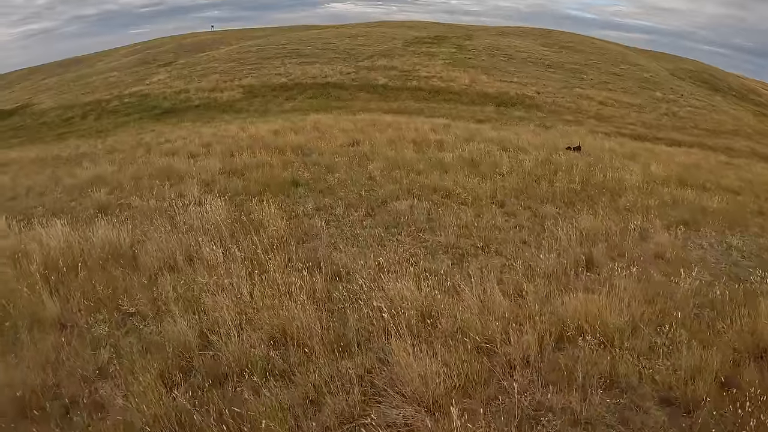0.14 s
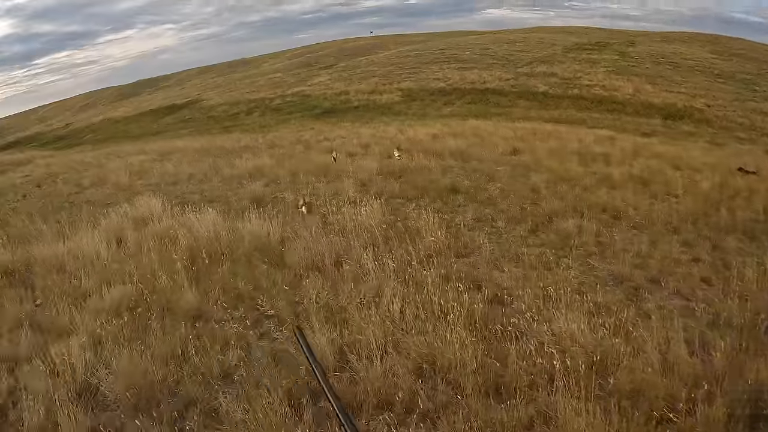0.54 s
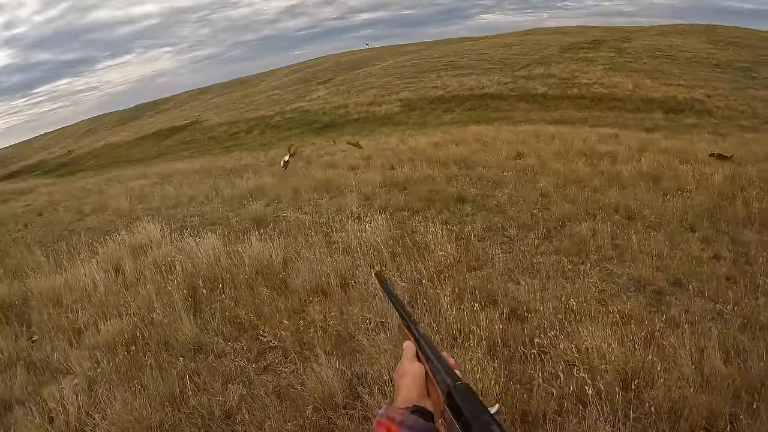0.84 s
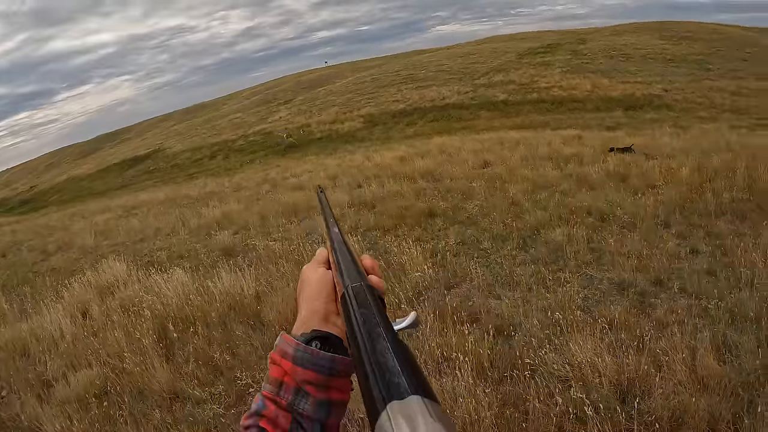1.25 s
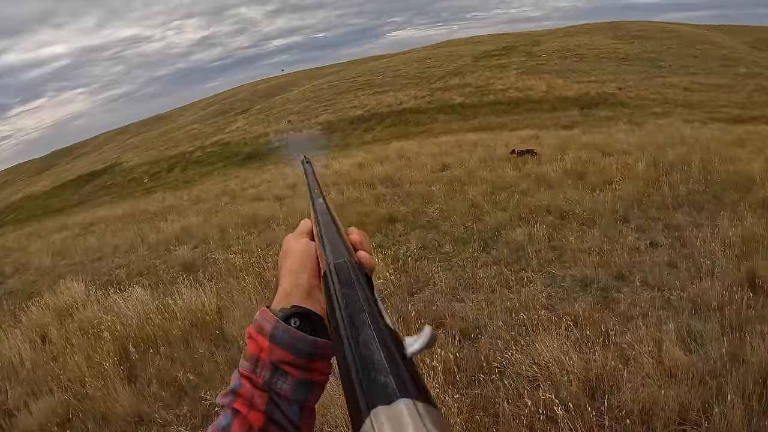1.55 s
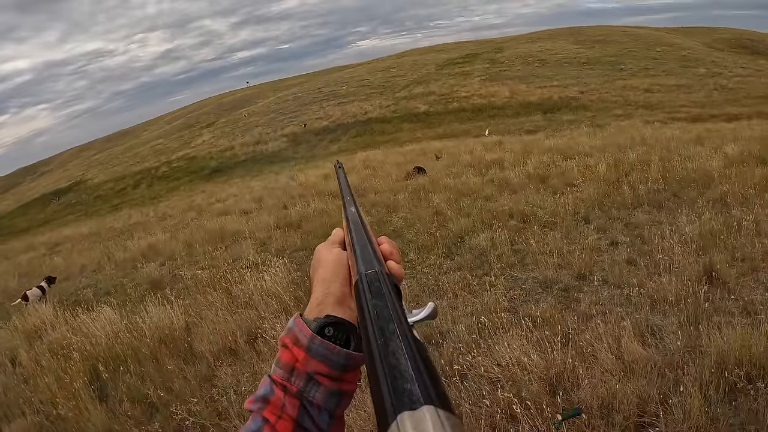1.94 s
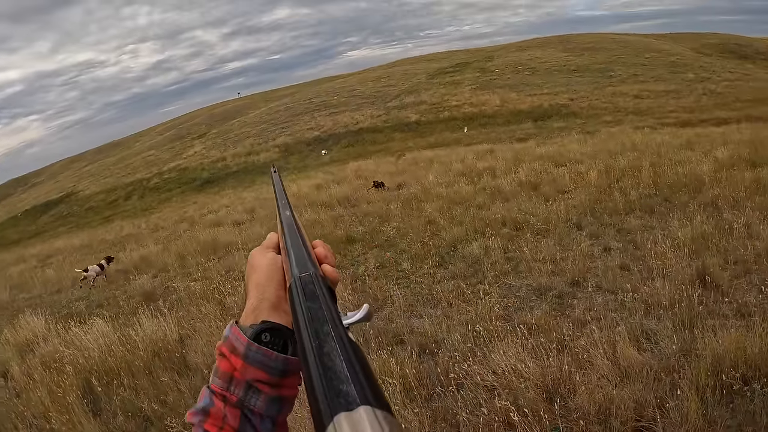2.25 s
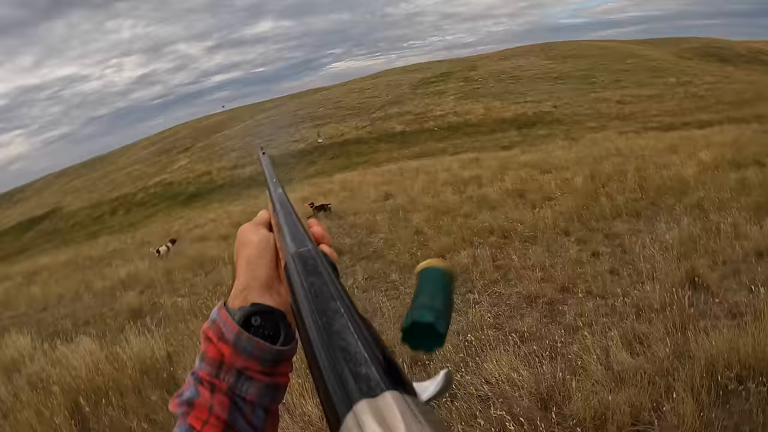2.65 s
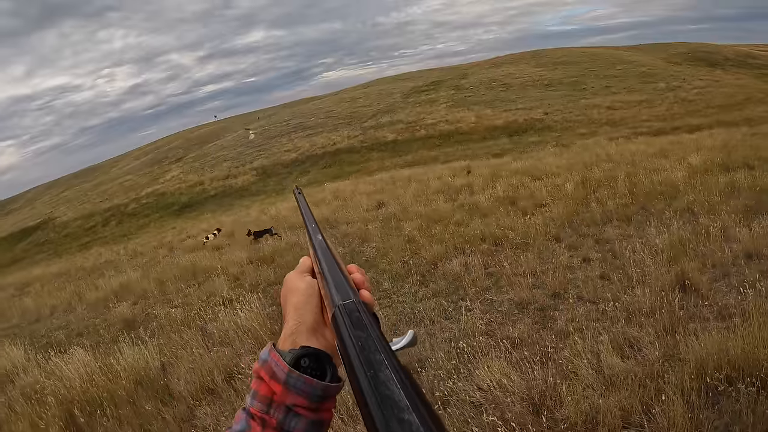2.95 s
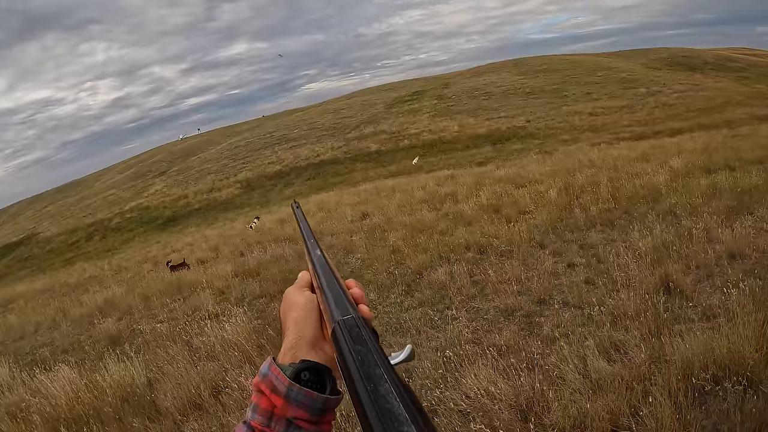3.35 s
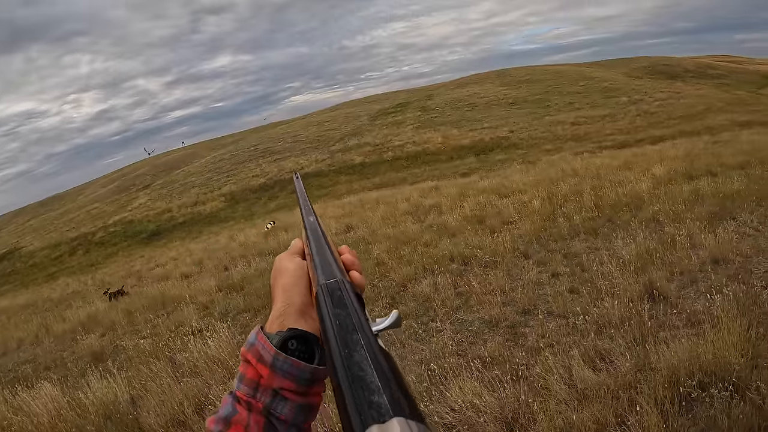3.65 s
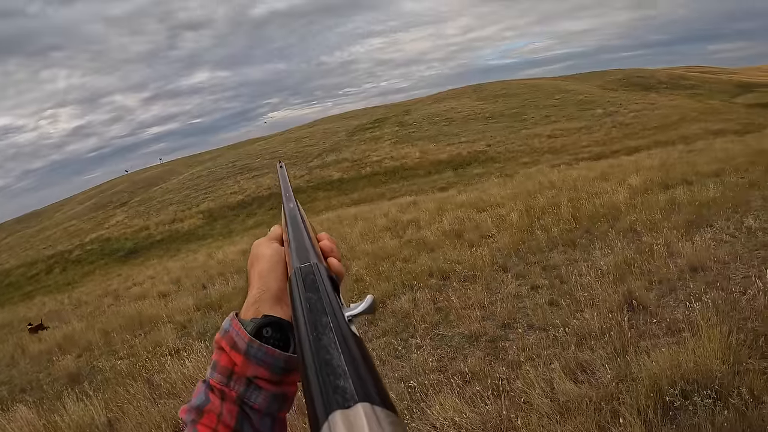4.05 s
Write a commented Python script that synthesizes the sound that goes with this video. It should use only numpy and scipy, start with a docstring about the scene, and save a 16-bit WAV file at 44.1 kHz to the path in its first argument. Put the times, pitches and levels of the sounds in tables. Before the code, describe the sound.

Outdoors on open grassy hills, heard from the shooter's position. Light wind, then a sudden rush of dry stems and rapid wingbeats as grouse flush nearby, clucking. The whirr draws away before two harsh, clipping shotgun shots about a second apart, each followed by quick metal clacks and a short hollow echo. Faint clucks continue between and after the shots.

```python
"""On dry prairie among grassy hills, grouse burst from the grass close to a hunter and fly off clucking.
Their wings whirr: bands of noise shaped by each stroke. The clucks are harmonic stacks through a throat.
Stems rustle as clumped impulses. Two shots from a self-loading shotgun follow, right at the microphone:
shock fronts and noise bursts, then clacks and ringing modes of the action. The hills return a short
rolling echo of decaying noise, over light wind of slowly varying coloured noise."""
import sys
import numpy as np
from scipy import signal
from scipy.fft import rfft, irfft
from scipy.io import wavfile
from scipy.ndimage import uniform_filter1d

SR = 44100
rng = np.random.default_rng(int(sys.argv[2]) if len(sys.argv) > 2 else 0)


def pcm_store(signal):
    """Save signal as 16-bit PCM."""
    levels = np.round(np.clip(np.atleast_2d(signal), -1, 1) * 32767)
    wavfile.write(sys.argv[1], SR, levels.astype(np.int16).T)


N = 185600

# Air buffeting the microphone, with one gust as the hunter swings the gun up.
# Each row: time in seconds, level in dB.
BUFFET_LEVEL = [(0, -37.5), (.27, -49), (.48, -24), (.68, -27), (.85, -32), (1.3, -40.5), (1.8, -38),
                (2.05, -52.5), (4.2, -55)]
# Spectrum of the buffeting. Each row: frequency in Hz, relative level in dB.
BUFFET_SPECTRUM = [(8, -4), (22, 0), (45, -8), (70, -5), (110, -12), (200, -26), (500, -70.5)]
# Wash of the open prairie, also the colour of the distant wings and slopes.
# Each row: frequency in Hz, relative level in dB.
AIR_SPECTRUM = [(60, -2), (150, -2.5), (250, -8), (550, -4.5), (900, -11.5), (1400, -13), (2200, -30),
                (5000, -42), (15500, -71)]
# Steady faint hiss. Each row: frequency in Hz, relative level in dB.
HISS_SPECTRUM = [(500, -0.5), (2500, -3.5), (5000, 2), (7500, -5), (9500, -19.5), (15500, -38)]
AIR_START_DB, AIR_FALL_DB_PER_S = -50.5, 5  # the breeze dies away

# Likeness of the noise at the two ports. Each row: frequency in Hz, correlation from 0 to 1.
LIKENESS = [(25, .8), (70, 1), (500, 0.95), (3000, 0.89), (6000, 1), (9000, 0.92), (14000, .5)]
# Balance of the ports; the left hears more of the high treble.
# Each row: frequency in Hz, left minus right in dB.
PORT_BALANCE = [(60, 0), (200, -1), (700, 0.1), (2400, -0.4), (4400, -0.5), (8000, 3.2), (15000, 4.5)]
# Phase between the ports; the right hears the middle range slightly early.
# Each row: frequency in Hz, radians by which the left leads.
PORT_PHASE = [(200, 0.11), (600, -0.098), (1300, -0.22), (3000, -.3), (7000, -0.071), (12000, 0)]
EDGE_HZ = 15750

# Swish of the grass. Each row: frequency in Hz, relative level in dB.
SWISH_SPECTRUM = [(120, -23), (200, -4.5), (385, -8.5), (800, -13.5), (1200, -9.5), (2560, -14),
                  (5000, -13), (7000, -16), (10000, -32), (12500, -30), (15500, -55.5)]
# Snapping stems, brighter than the swish. Each row: frequency in Hz, relative level in dB.
SNAP_SPECTRUM = [(120, -22), (200, -4), (800, -10), (1200, -7.5), (2500, -13.5), (7000, -10.5),
                 (10000, -23), (12500, -22.5), (15500, -49.5)]
# Rustle of dry stems brushed by birds and clothing. Each row: time in seconds, level in dB.
RUSTLE_LEVEL = [(.17, -75), (.23, -46), (.5, -46.5), (.9, -50.5), (1.56, -51), (2.2, -66), (3.7, -69),
                (4.2, -60)]
# Birds tearing out through the stems. Each row: middle in seconds, level in dB.
THRASHES = [(0.346, -31.5), (0.423, -33), (0.493, -40)]
THRASH_S = 0.013  # half width of each
# Sharp ticks of stems, wingtips and the gun being handled.
# Each row: start in seconds, peak of the main resonance in dB, its centre in Hz.
TICKS = [(0.139, -45.5, 5360), (0.304, -29, 2100), (0.3801, -19, 1870), (0.5098, -9.5, 2130),
         (0.562, -23, 1040), (1.075, -30, 3000), (1.088, -30.5, 4700), (1.112, -31, 2000),
         (1.2426, -26, 1440), (1.456, -33.5, 2840), (2.286, -41, 4800)]
TICK_OCTAVES, TICK_DECAY_S = 0.47, 0.0017  # half width of the resonance, decay of the fizz

# Loudness of the wings as the birds climb out of the grass and draw away.
# Each row: time in seconds, level in dB.
WING_LEVEL = [(.3, -37), (.58, -31.5), (.95, -32.5), (1.3, -38.5), (1.47, -43), (1.6, -53), (2.2, -63),
              (4.2, -61)]
# Push of air from each stroke. Each row: time in seconds, peak in dB.
PUSH_LEVEL = [(.42, -28.5), (.58, -15), (.78, -27), (1.2, -29.5), (1.52, -23.5), (2.2, -43)]
# Hiss of the feathers. Each row: frequency in Hz, relative level in dB.
FEATHER_SPECTRUM = [(80, -1.5), (160, -2.0), (400, 0.5), (1000, 4.5), (2000, -6.5), (5000, -14.5),
                    (8000, -33.5), (14000, -44.5)]
# Massed wing slaps of the flock. Each row: frequency in Hz, relative level in dB.
SLAP_SPECTRUM = [(70, -54), (140, 9.0), (220, 5.0), (320, -5.0), (900, 0.5), (1600, -3.5),
                 (3000, -15.5), (8000, -29), (15000, -47.5)]
# The nearest bird beats fastest at take-off; every beat lasts a little longer than the one before.
TAKE_OFF_S, FIRST_BEAT_S, BEAT_GROWTH_S = .3138, .0656, .00072
CRUISE_FROM_S, CRUISE_BEATS_PER_S = 2.2, 13.6  # further off, the flock settles to a nearly even beat
WHOOSH_HZ, WHOOSH_SAG_OCTAVES_PER_S = 614, .38  # the whoosh sinks as the strokes ease

# Clucks of the birds. Each row: middle in seconds, level in dB before the rasp and fade,
# nominal pitch in Hz, length in seconds.
CLUCKS = [(.619, -36.5, 420, 0.051), (.652, -32.5, 338, .057), (0.755, -40.5, 328.4, 0.054),
          (.85, -35.5, 381.5, 0.025), (0.959, -35, 368, .045), (1.064, -34, 350.4, .031),
          (1.186, -42, 331, 0.049), (1.314, -40, 340.4, 0.034), (1.436, -43, 346, 0.039),
          (2.156, -54.5, 356, 0.047), (2.264, -54, 334, 0.029), (2.371, -50.5, 386, 0.027),
          (2.459, -45, 399, 0.028), (2.57, -48.5, 368, .025), (3.158, -54, 358, 0.043),
          (3.282, -50, 365, 0.026), (3.395, -49, 376.5, 0.027), (3.492, -50.5, 374, 0.042),
          (3.602, -47, 365, .038), (3.734, -54, 360, .032), (3.894, -55.5, 344, 0.043),
          (4.008, -54.5, 361, 0.035)]
# Resonance of the bird's throat. Each row: frequency in Hz, gain in dB.
THROAT = [(300, -11), (700, 1.5), (1080, 6.5), (1400, -3.5), (1750, -20), (2400, -56)]
# As the birds draw off, the grass swallows their lower harmonics.
# Each row: time in seconds, tilt in dB per octave above the fundamental.
CLUCK_TILT = [(1.5, -5), (2.3, 15)]
GLIDE_OCTAVES_PER_S, LEVEL_NOTE_S = -13.5, 0.0399  # longer notes tend to fall, shorter ones to rise

# The shots. Each row: time in seconds, crack in dB, rush that swells into it in dB,
# rise time of the rush in seconds, echo in dB, force of the action in dB,
# delay of the last clack in seconds, its level in dB before the force is added.
SHOTS = [(1.6154, -7.5, -12, 0.014, -28, -1, .1958, -21.5),
         (2.6806, -6, -17.5, 0.012, -27, 0.5, .2117, -16)]
# Muzzle crack. Each row: frequency in Hz, relative level in dB.
CRACK_SPECTRUM = [(180, -29.5), (300, 0), (674, -5.5), (1140, 0), (1540, -9.5), (1970, -7), (2520, -0.5),
                  (2830, -4.5), (3630, -9.5), (4720, -6.5), (5210, -11), (7500, -13), (8700, -22.5),
                  (12100, -28.5), (15500, -60)]
# Dull slap off the ground. Each row: frequency in Hz, relative level in dB.
SLAP_OFF_GROUND = [(200, -8.5), (500, -4), (850, -0.5), (1500, -8), (3000, -36.0), (10000, -52)]
# Slow pressure waves of recoil, ground bounce, the gun settling and the bolt home.
# Each row: delay in seconds, signed height (full scale is 1), half width in seconds.
WAVES = [(.0086, -.32, 0.0011), (0.015, 0.43, 0.0013), (.128, .035, .009), (.209, 0.011, 0.0012)]
# Colour of the echo. Each row: frequency in Hz, relative level in dB.
ECHO_SPECTRUM = [(60, 5.5), (150, 6.5), (300, -4.5), (450, -1.5), (900, 0.5), (2000, -6.5), (4500, -3.5),
                 (7000, -2), (10000, -12.5), (15000, -30)]
# Decay of the echo. Each row: frequency in Hz, time to fall 60 dB in seconds.
ECHO_T60 = [(60, 0.67), (500, 0.48), (1500, 1), (4000, 0.79), (8000, 0.56), (14000, .55)]
# Hollow falling echoes off the slopes. Each row: delay in seconds, length in seconds,
# level in dB before fading, first frequency in Hz, last frequency in Hz, resonator bandwidth in Hz.
ROLLS = [(0.019, .16, -38.5, 260, 180.3, 140), (0.124, .19, -37, 172, 135.3, 56),
         (0.2, .13, -41, 820, 470, 420), (.27, .24, -46, 570, 380, 440)]
ROLL_FADE_DB_PER_S = 29
# Rattle of the steel. Each row: frequency in Hz, relative level in dB.
STEEL_SPECTRUM = [(240, -49), (400, -20), (914, -6), (1130, -8), (2090, -2), (2550, -6.5), (3790, -2),
                  (4160, -5.5), (4420, -0.5), (5310, -8), (6680, -6), (7550, -9.5), (10100, -18.5),
                  (14800, -42.5), (15500, -47)]
# Ringing modes of the receiver. Each row: frequency in Hz, relative level in dB,
# time to fall 60 dB in seconds.
ACTION_MODES = [(1860, -4, 0.047), (2137, -8.5, 0.027), (3275, -29.5, 0.072), (3730, -16.5, 0.05),
                (4250, -28, 0.092), (5535, -4.5, 0.03), (7720, -24.5, 0.22), (9700, -15.5, 0.061)]
# Cycle after each shot: bolt unlocks, slides back, shell thrown out, next shell lifted,
# fed into the chamber, bolt slams home. Each row: delay in seconds, level in dB before the
# force is added, decay constant in seconds, tilt in dB per octave.
CYCLE = [(0.0311, -15, .004, -1.5), (.038, -26, .009, -4), (.064, -27, 0.0049, -6),
         (0.0952, -30, 0.0033, 0.5), (0.1259, -24, .0035, -0.5), (.1334, -16, .0048, .5)]
LAST_CLACK_DECAY_S, LAST_CLACK_TILT_DB = .0022, -3  # tilt per octave


def amp(db):
    """Gain is the exponential of a level in decibels."""
    return 10 ** (np.asarray(db) / 20)


def unit(x):
    """Normalisation divides a signal by its root mean square."""
    return x / np.sqrt(np.mean(x ** 2) + 1e-20)


def read(points, hz):
    """A spectrum is interpolated on a logarithmic frequency axis."""
    f, value = np.transpose(points)
    return np.interp(np.log(hz + 1), np.log(f + 1), value)


def at(rows, s):
    """A curve is interpolated linearly at time s."""
    return np.interp(s, *np.transpose(rows))


def level(rows):
    """An envelope in dB becomes a gain for every sample."""
    return amp(at(rows, np.arange(N) / SR))


def seconds(length):
    """Sample times from zero."""
    return np.arange(int(length * SR)) / SR


def add(mix, s, sound):
    """Superposition: a sound is summed into the mix from time s."""
    part = mix[:, max(round(s * SR), 0):][:, :sound.shape[-1]]
    part += sound[..., :part.shape[1]]


def smooth(x, *sizes):
    """Moving averages leave the slow part of a signal, scaled to rms 1."""
    for size in sizes:
        x = uniform_filter1d(x, size=size)
    return unit(x)


def colour(x, spectrum):
    """Linear filtering multiplies a signal's transform by a spectrum; the result has rms 1."""
    n = x.shape[-1]
    gain = amp(read(spectrum, np.fft.rfftfreq(n, 1 / SR)))
    return unit(irfft(rfft(x) * gain, n))


def noise(spectrum, n, tilt_db=0):
    """Partial coherence: sum and difference of two noises give two ports of set likeness."""
    size = 2 ** int(np.ceil(np.log2(n)))
    hz = np.fft.rfftfreq(size, 1 / SR)
    mid, side = rfft(rng.standard_normal((2, size)))
    same = np.clip(read(LIKENESS, hz), 0, 1)
    side = side * np.sqrt((1 - same) / (1 + same))
    gain = amp(read(spectrum, hz) + tilt_db * np.log2(hz + 1))
    return unit(irfft(np.array([mid + side, mid - side]) * gain)[:, :n])


def hollow(hz, width_hz, unevenness=1):
    """Narrow-band noise modulates a carrier along the curve hz; unevenness under 1 steadies it."""
    r = np.exp(-np.pi * abs(width_hz) / SR)
    a, b = rng.standard_normal((2, SR))
    slow = signal.lfilter([1], [1, -2 * r, r * r], a + 1j * b)[-len(hz):]
    strength = unit(abs(slow)) ** unevenness
    phase = np.angle(slow) + 2 * np.pi * np.cumsum(hz) / SR
    return unit(strength * np.cos(phase))


def bell(u):
    """A Gaussian hump of height 1."""
    return np.exp(-u ** 2 / 2)


def push(u):
    """A bipolar pressure wave of height 1: compression, then suction."""
    return -u * bell(u) * np.exp(.5)


def burst(t, decay, rise=0.00026):
    """Transient envelope: a quick rise from t = 0 and an exponential fall."""
    t = np.maximum(t, 0)
    return (1 - np.exp(-t / rise)) * np.exp(-t / decay)


def buffeting():
    """Turbulence: moving air presses on the microphone as noise of very low frequency."""
    return level(BUFFET_LEVEL) * noise(BUFFET_SPECTRUM, N)


def breeze(waver_db=1.85):
    """Aerodynamic noise: the prairie wash wavers as it dies away."""
    waver = smooth(rng.standard_normal(N), 2200, 900)
    fall_db = AIR_START_DB - AIR_FALL_DB_PER_S * np.arange(N) / SR
    return amp(fall_db + waver_db * waver) * noise(AIR_SPECTRUM, N)


def hiss(db=-69):
    """Stationary noise: a faint hiss of constant level."""
    return amp(db) * noise(HISS_SPECTRUM, N)


def grass(snaps_per_s=2000, snaps_db=-1, swish_db=-4, clump_db=5.0, thrash_db=-39, snap_power=.8,
          waver_db=1.5):
    """Random impulses: clumped stem snaps, mostly where grass is thrashed hard, inside a soft swish."""
    sizes = amp(4.5 * np.minimum(rng.exponential(1, N), 4))
    sizes = sizes * (rng.random(N) < snaps_per_s / SR)
    # a shared sign and a small independent part at each port
    signs = rng.choice([-1, 1], N) + .35 * rng.standard_normal((2, N))
    snaps = colour(sizes * signs, SNAP_SPECTRUM)
    clumps = unit(amp(clump_db * smooth(rng.standard_normal(N), 500)))
    waver = smooth(rng.standard_normal(N), 1100, 400)  # the rustle comes and goes
    thrashes = sum(amp(db) * bell((np.arange(N) / SR - s) / THRASH_S) for s, db in THRASHES)
    strength = np.hypot(level(RUSTLE_LEVEL), thrashes) * amp(waver_db * waver)
    snap_share = np.minimum(strength / amp(thrash_db), 1) ** snap_power
    snapping = amp(snaps_db) * snap_share * clumps * snaps
    return strength * (snapping + amp(swish_db) * noise(SWISH_SPECTRUM, N))


def ticks(fizz=0.2, bright_db=-11, bright_hz=6400, bright_octaves=0.1):
    """Impulse response: a click and a little fizz ring one broad resonance and a thin bright one."""
    out, t = np.zeros((2, N)), seconds(.04)
    for s, db, centre_hz in TICKS:
        flat = noise([(100, 0), (16000, 0)], len(t))
        snap = (t == 0) + fizz * flat * burst(t, TICK_DECAY_S)
        resonances = [(centre_hz, TICK_OCTAVES, 0), (bright_hz, bright_octaves, bright_db)]
        for hz, octaves, part_db in resonances:
            edges_hz = np.clip([hz / 2 ** octaves, hz * 2 ** octaves], 100, 15000)
            band = signal.butter(2, edges_hz, "bandpass", fs=SR, output="sos")
            ring = signal.sosfilt(band, snap)
            add(out, s, amp(db + part_db) * ring / abs(ring).max())
    return out


def whirr(db=-16):
    """Incoherent summation: the other birds' wings blur into a soft wash that leaves with the flock."""
    rise = np.clip((np.arange(N) / SR - TAKE_OFF_S) / FIRST_BEAT_S, 0, 1)
    return amp(db) * rise * level(WING_LEVEL) * noise(AIR_SPECTRUM, N)


def flurry(start=.298, peak=0.5, end=0.92, db=-36, slaps_per_s=130, slap_decay=0.0029):
    """Shot noise: the flock takes off together as a dense, rough patter of wing slaps that fades."""
    slaps = (rng.random(N) < slaps_per_s / SR) * rng.uniform(0.75, 1, N)
    envelope = signal.oaconvolve(slaps, burst(seconds(.03), slap_decay))[:N]
    patter = unit(envelope + 0.17)  # the floor keeps the gaps from falling silent
    corners = [start, start + 0.0058, peak, end]
    swell = np.interp(np.arange(N) / SR, corners, [0.044, 0.98, 1, 0.023])
    return amp(db) * swell * patter * noise(SLAP_SPECTRUM, N)


def beat_times(near_count=18, far_count=27):
    """Periodicity: the slowing beats of the climb, then the nearly even beats of the departing flock."""
    k = np.arange(near_count)
    climb = TAKE_OFF_S + k * FIRST_BEAT_S + BEAT_GROWTH_S * k ** 2 / 2
    cruise = CRUISE_FROM_S + np.arange(far_count) / CRUISE_BEATS_PER_S
    return np.concatenate([climb, cruise + .003 * rng.standard_normal(far_count)])


def wings(stroke=.0068, hiss_stroke=0.0105, fall_octaves_per_s=22, push_delay=0.016, push_width=.0042,
          whoosh_width_hz=190, flutter_db=4.8, thud_db=-5, thud_hz=140, hiss_db=-10, hiss_follow=0.84,
          spread_db=1.5, pitch_spread=0.063, whoosh_flutter=.6):
    """Unsteady flow: each downstroke is a falling whoosh, feather hiss and thud, then a push of air."""
    out, t = np.zeros((2, N)), seconds(.1) - .05
    steady = np.full(len(t), thud_hz)
    times = beat_times()
    for s, (strength, pitch) in zip(times, rng.standard_normal((len(times), 2))):
        whoosh_db = at(WING_LEVEL, s) + spread_db * strength
        sag = WHOOSH_SAG_OCTAVES_PER_S * min(s - TAKE_OFF_S, 1)
        hz = WHOOSH_HZ * 2 ** (pitch_spread * pitch - sag - fall_octaves_per_s * t)
        whoosh = amp(whoosh_db) * hollow(hz, whoosh_width_hz, unevenness=0.54) * bell(t / stroke)
        thud = hollow(steady, 60, unevenness=0.13) * bell((t - stroke) / stroke)
        thud = amp(whoosh_db + thud_db) * thud
        flutter = unit(amp(flutter_db * smooth(rng.standard_normal(len(t)), 110)))
        feathers = noise(FEATHER_SPECTRUM, len(t)) * flutter * bell(t / hiss_stroke)
        feathers = amp(hiss_db + hiss_follow * whoosh_db) * feathers
        air_push = amp(at(PUSH_LEVEL, s)) * push((t - push_delay) / push_width)
        add(out, s + t[0], whoosh * flutter ** whoosh_flutter + thud + feathers + air_push)
    return out


def clucks(arch_octaves=0.18, rasp=0.28, glide_spread=0.074, wobble_share=0.027):
    """Source and filter: short arched notes, slightly rough harmonic stacks, pass the throat."""
    out = np.zeros((2, N))
    for s, db, pitch_hz, length in CLUCKS:
        u = np.linspace(-1, 1, int(length * SR))
        wobble, flutter = (smooth(v, 70)[:len(u)] for v in rng.standard_normal((2, 8192)))
        glide = GLIDE_OCTAVES_PER_S * (length - LEVEL_NOTE_S) + glide_spread * rng.standard_normal()
        octaves = glide * u / 2 - arch_octaves * (u ** 2 - .1)
        hz = pitch_hz * 2 ** octaves * (1 + wobble_share * wobble)
        phase = 2 * np.pi * np.cumsum(hz) / SR
        voice = np.zeros(len(u))
        for k in range(1, 7):
            harmonic_db = read(THROAT, k * hz) + at(CLUCK_TILT, s) * np.log2(k)
            voice += amp(harmonic_db) * np.cos(k * phase)
        fade = np.cos(u * np.pi / 2)
        add(out, s - length / 2, amp(db) * unit(voice) * (1 + rasp * flutter) * fade)
    return out


def far_hills(db=-28, delay=.55, spread=0.29):
    """Delayed reflection: the furthest slopes return each shot as a faint, dull swell."""
    swells = np.zeros(N)
    for s, _, _, _, echo_db, *_ in SHOTS:
        swells += amp(db + echo_db) * bell((np.arange(N) / SR - s - delay) / spread)
    return swells * noise(AIR_SPECTRUM, N)


def scattered_tail(t, patchy_db):
    """Diffuse decay: patchy noise in which each frequency dies at its own rate."""
    hz, age, z = signal.stft(noise(ECHO_SPECTRUM, len(t)), SR, nperseg=256)
    patches = rng.standard_normal(z.shape[1:])
    patches = uniform_filter1d(patches, size=14, axis=0)  # across frequency
    patches = unit(uniform_filter1d(patches, size=4, axis=1))  # across time
    gain = amp(patchy_db * patches - 60 * age / read(ECHO_T60, hz)[:, None])
    return signal.istft(z * gain, SR, nperseg=256)[1][:, :len(t)]


def hills(patchy_db=2.5, near_db=-8, far_delay=.19, far_rise=0.045, far_db=0):
    """Scattering: near grass returns a little, far slopes more, and hollow echoes slide down."""
    out, t = np.zeros((2, N)), seconds(0.67)
    slopes = (1 + np.tanh((t - far_delay) / far_rise)) / 2
    for s, _, _, _, echo_db, *_ in SHOTS:
        tail = scattered_tail(t, patchy_db)
        add(out, s, amp(echo_db) * tail * (amp(near_db) + amp(far_db) * slopes))
        for delay, length, db, first_hz, last_hz, width_hz in ROLLS:
            n = int(length * SR)
            glide_hz = np.geomspace(first_hz, last_hz, n)
            mid, side = (hollow(glide_hz, width_hz) for _ in range(2))
            roll = mid + 0.15 * side * np.array([[1], [-1]])
            fade = signal.windows.tukey(n, .5) * amp(-ROLL_FADE_DB_PER_S * t[:n])
            add(out, s + delay, amp(db) * roll * fade)
    return out


def action(ring_db=-17):
    """Modal excitation: slamming steel parts give rattling bursts and a short ring of the receiver."""
    out, t = np.zeros((2, N)), seconds(.15)
    top_db = max(mode[1] for mode in ACTION_MODES)
    for s, *_, force_db, last_delay, last_db in SHOTS:
        last_clack = (last_delay, last_db, LAST_CLACK_DECAY_S, LAST_CLACK_TILT_DB)
        for delay, db, decay, tilt_db in CYCLE + [last_clack]:
            phases = rng.uniform(0, 2 * np.pi, len(ACTION_MODES))
            ring = np.zeros(len(t))
            for (hz, mode_db, t60), phase in zip(ACTION_MODES, phases):
                ring += amp(mode_db - top_db - 60 * t / t60) * np.sin(2 * np.pi * hz * t + phase)
            rattle = noise(STEEL_SPECTRUM, len(t), tilt_db) * burst(t, decay)
            add(out, s + delay, amp(db + force_db) * (rattle + amp(ring_db) * ring))
    return out


def blasts(decay=0.0037, second_delay=.0045, second_db=1.5, bounce_delay=.0125, bounce_db=-10,
           shock=.9, shock_length=0.000067):
    """Shock wave: a pressure jump and two close cracks, a dull ground slap and slow pressure waves."""
    out, t = np.zeros((2, N)), seconds(.32) - .06
    arrival = t - np.array([[0], [.0003]])  # the slow waves reach the right port later
    for s, crack_db, rush_db, rush_rise, *_ in SHOTS:
        u = np.maximum(t, 0) / shock_length
        front = shock * (t > 0) * (1 - u) * np.exp(-u)  # a jump in pressure, then a shallow suction
        second = amp(second_db) * burst(t - second_delay, 0.0014)
        cracks = amp(crack_db) * (burst(t, decay, rise=.0001) + second)
        rush = amp(rush_db) * np.exp(-np.maximum(-t / rush_rise, t / 0.014) ** 1.28)
        roar = np.hypot(cracks, rush) * noise(CRACK_SPECTRUM, len(t))
        slap = amp(bounce_db) * burst(t - bounce_delay, 0.0034) * noise(SLAP_OFF_GROUND, len(t))
        waves = sum(height * push((arrival - delay) / width) for delay, height, width in WAVES)
        add(out, s + t[0], front + roar + slap + waves)
    return out


def scene(birds_left_db=.5, wind_left_db=-0.26):
    """Superposition of wind, flock and gun; each offset raises the left port and lowers the right."""
    ports = np.array([[1], [-1]])
    wind = buffeting() + breeze() + hiss()
    birds = grass() + ticks() + whirr() + flurry() + wings() + clucks()
    gun = far_hills() + hills() + action() + blasts()
    return wind * amp(wind_left_db * ports) + birds * amp(birds_left_db * ports) + gun


def record(dry):
    """Transduction: the ports differ in colour and phase, the input overloads, then the band is limited."""
    hz, ports = np.fft.rfftfreq(N, 1 / SR), np.array([[1], [-1]]) / 2
    balance = amp(read(PORT_BALANCE, hz) * ports)
    response = balance * np.exp(1j * read(PORT_PHASE, hz) * ports)
    clipped = np.clip(irfft(rfft(dry) * response, N), -1, 1)
    lowpass = signal.firwin(511, EDGE_HZ, window=("kaiser", 9), fs=SR)
    return signal.oaconvolve(clipped, lowpass[None], "same")


dry = scene()
out = record(dry)
pcm_store(out)
```